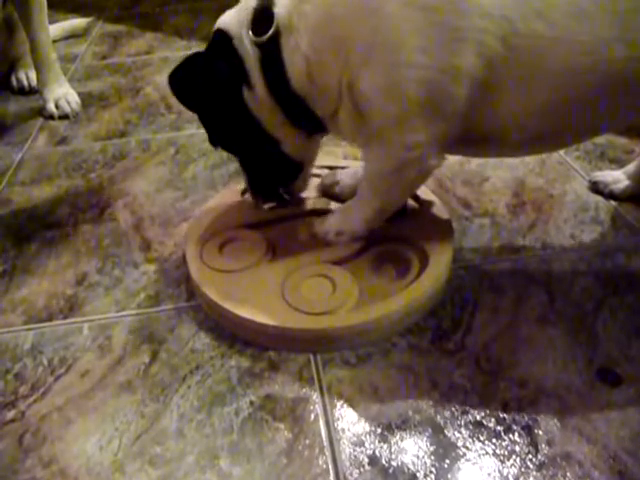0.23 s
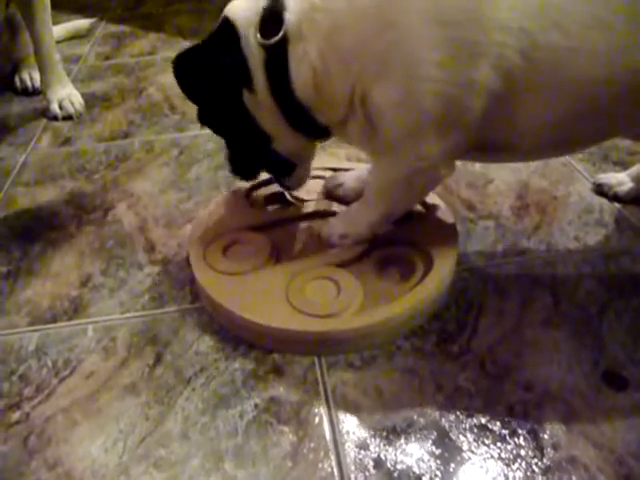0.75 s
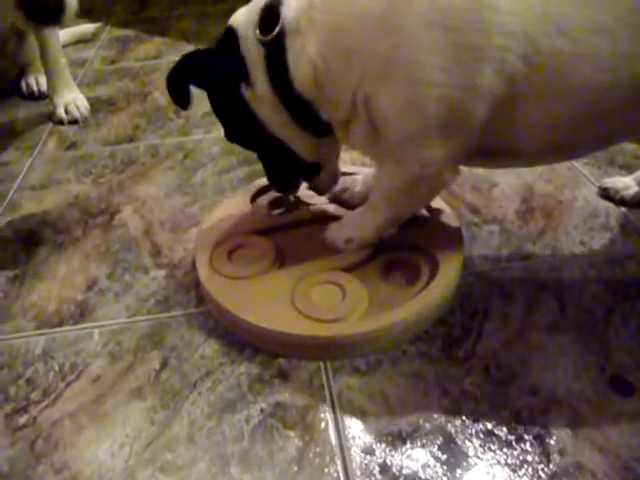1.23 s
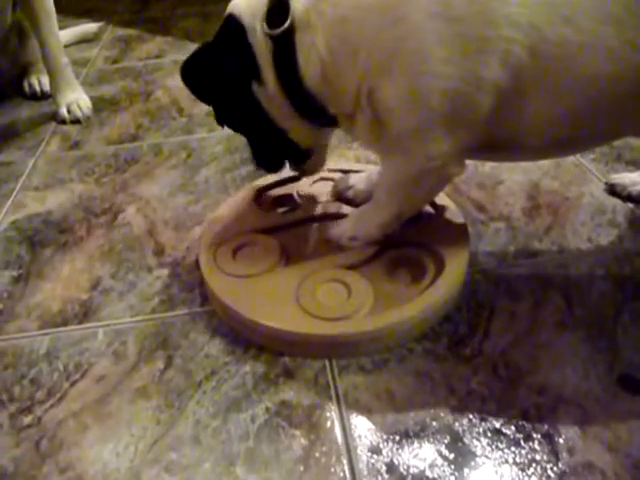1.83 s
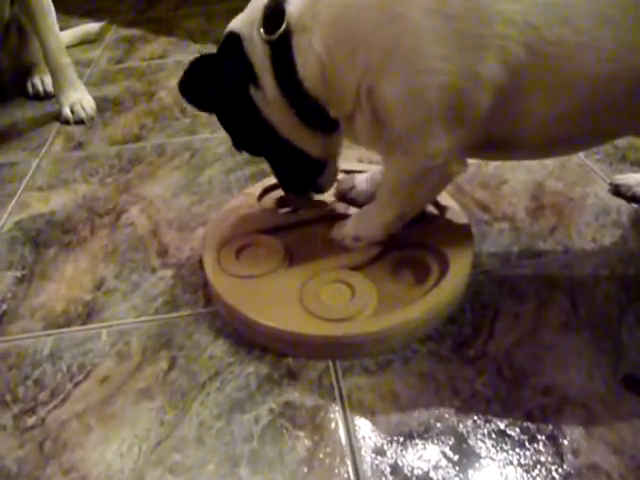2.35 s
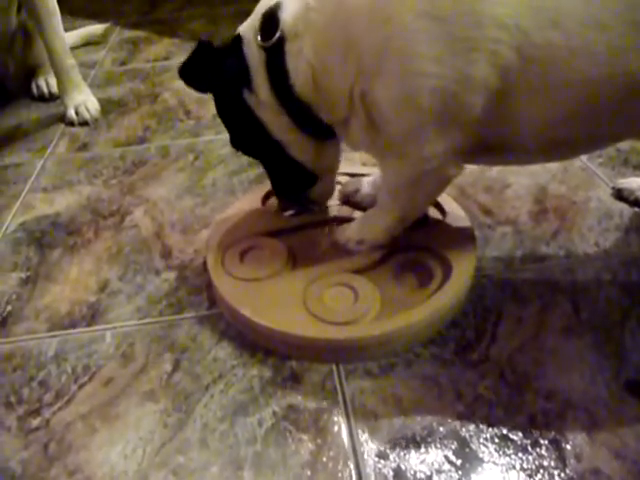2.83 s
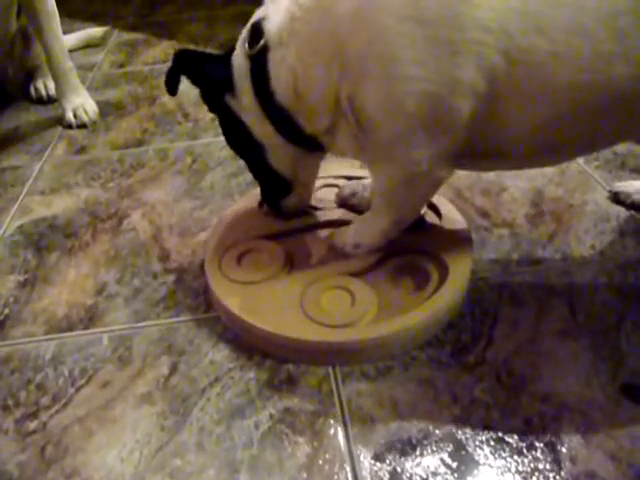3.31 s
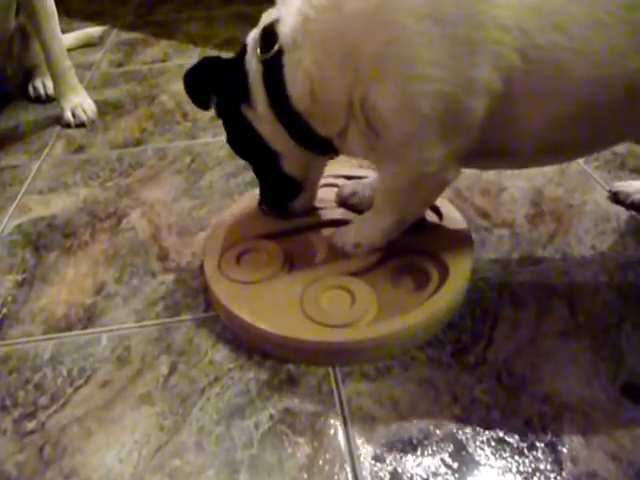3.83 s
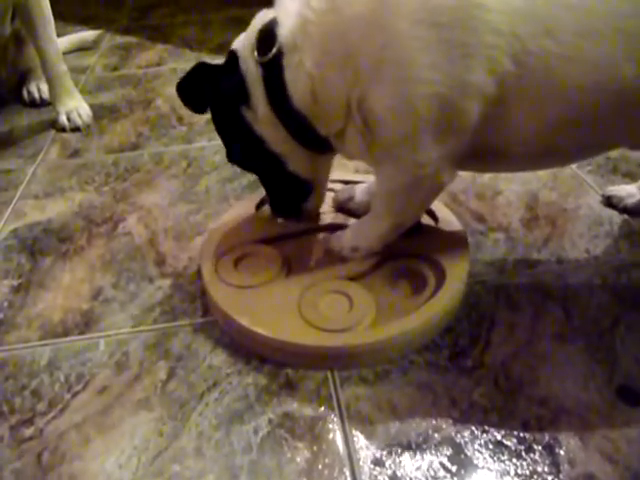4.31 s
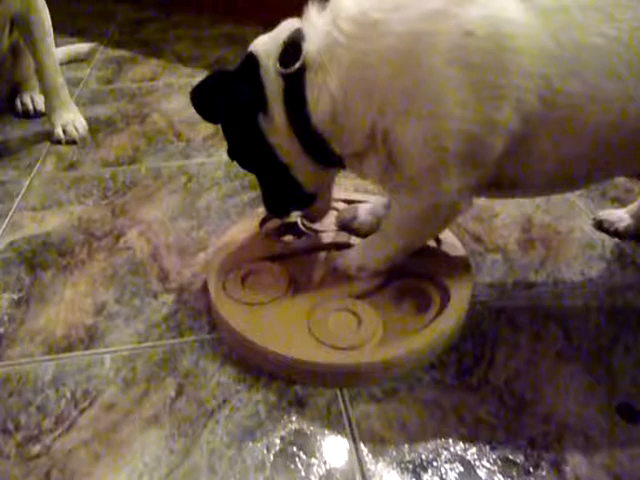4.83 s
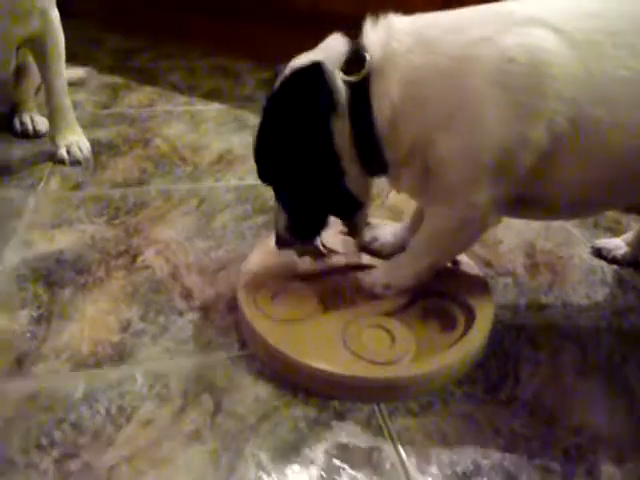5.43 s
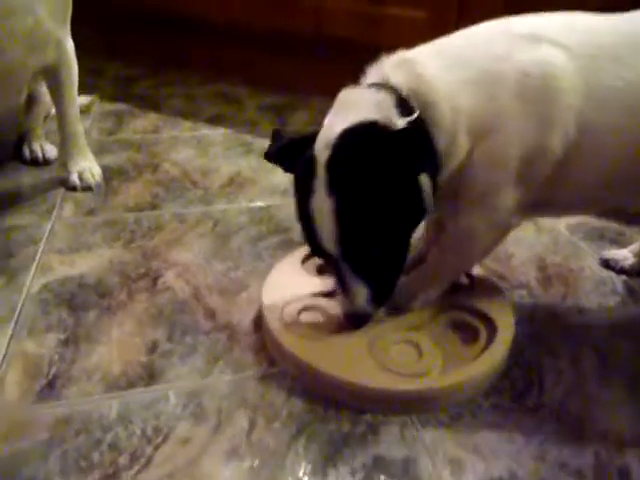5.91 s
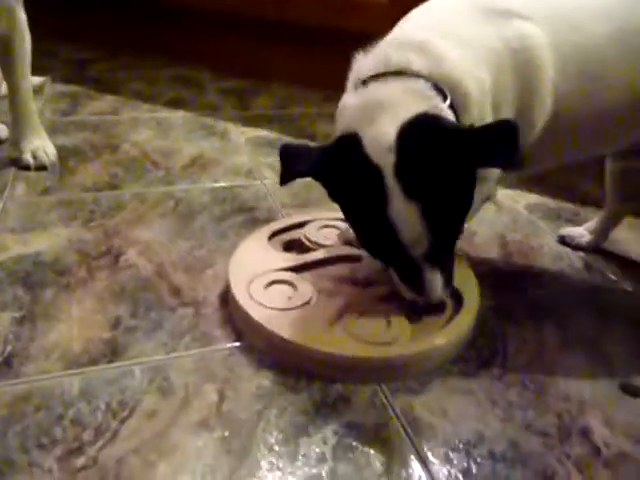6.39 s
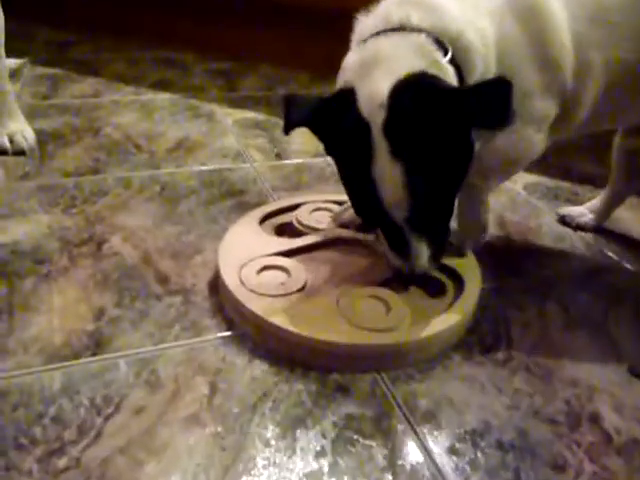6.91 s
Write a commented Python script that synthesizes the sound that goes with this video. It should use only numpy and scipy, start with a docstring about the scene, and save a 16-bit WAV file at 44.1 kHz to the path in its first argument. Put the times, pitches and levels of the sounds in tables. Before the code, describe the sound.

Dry knocks of loose discs on a hollow board, two very loud early on, then scraping, a sharp squeal and busy rattling indoors.

```python
"""A small dog noses and paws a wooden treat puzzle on the tiled floor of a live room.
From the start there is quiet room noise (shaped hiss) and a far motor (a sine) that slowly speeds up.
Discs knock on the board (fading sines), scrape in their grooves and snap on the rim (shaped noise).
From about 1.9 s one long push makes a disc groan, then squeal and creak (tones with uneven pitch).
From about 2.7 s soft bumps of the nose (short low sines) join the knocks and scrapes."""
import sys
import numpy as np
from scipy import signal
from scipy.fft import rfft, irfft
from scipy.io import wavfile

SR = 44100
rng = np.random.default_rng(int(sys.argv[2]) if len(sys.argv) > 2 else 0)


def digitize_waveform(pressure):
    """Quantize a signal to 16-bit integers and store it at the path in sys.argv[1].

    Rows of a 2-D input are taken as channels; values are limited to [-1, 1].
    """
    field = np.atleast_2d(pressure).T
    bounded = np.clip(field, -1, 1)
    quanta = np.round(bounded * 32767).astype(np.int16)
    wavfile.write(sys.argv[1], SR, quanta)


N = 315315
TIME = np.arange(N) / SR

# discs knock on the board:
# (time [s], level [dB], disc pitch [Hz], relative thud level [dB], time for the disc to fade by 60 dB [s])
KNOCK_EVENTS = [(0.031, -38, 1350, -6.5, 0.03), (0.056, -37.5, 1820, -4, 0.039),
                (.098, -28, 1580, -22, 0.0089), (0.09, -28, 1600, -28, 0.008),
                (0.139, -29, 1326, -10.5, 0.03), (0.166, -27.5, 1233, -16, 0.023),
                (0.195, -26.5, 1407, -16, 0.028), (.201, -27, 1300, -12.5, 0.014),
                (.451, -35, 1470, -12, 0.019), (0.366, -31.5, 1570, -33, 0.0073),
                (0.4646, -24.5, 1416, -11, 0.017), (.488, -23, 1365, -7, 0.026),
                (0.687, -37, 1480, -2.5, 0.0072), (0.935, -24, 900, -4.5, 0.009),
                (1.021, -1, 1577, -17, 0.011), (1.329, -7, 1520, -30, 0.026),
                (1.629, -27, 1543, -10.5, 0.019), (1.808, -43.5, 2010, -24, 0.02),
                (1.888, -30, 1560, -29, 0.006), (1.897, -33, 1500, -16, 0.0084),
                (1.925, -27.5, 1730, -11, 0.014), (1.936, -31, 1700, -12, 0.012),
                (1.984, -28.5, 1030, -3, 0.0048), (1.995, -25.5, 1373, -7, 0.021),
                (2.118, -33, 1780, -22, 0.011), (2.197, -27.5, 1840, -9, 0.017),
                (2.218, -29.5, 1410, -11, 0.0098), (2.45, -30.5, 1630, -3.5, 0.019),
                (2.532, -24.5, 1500, -16, 0.029), (2.847, -34, 1500, -13, 0.018),
                (2.869, -35, 1350, -26, 0.02), (2.883, -31.5, 1448, -10, 0.04),
                (2.946, -20, 1180, -13.5, 0.0051), (2.99, -29, 856, -23, 0.047),
                (3.233, -30, 1890, -22, 0.012), (3.278, -33.5, 1660, -25, 0.026),
                (3.414, -40.5, 1650, -8, 0.018), (3.451, -50, 1880, -14, 0.015),
                (3.649, -26, 1560, -13.5, 0.0048), (3.663, -35.5, 1500, -16, 0.0088),
                (3.85, -33.5, 970, -8, 0.024), (3.947, -36.5, 1010, -14, 0.02),
                (4.134, -29, 1432, -1.5, 0.026), (4.138, -32, 1047, -6, 0.014),
                (4.422, -43.5, 854, -19, 0.067), (4.17, -35.5, 920, -20, 0.015),
                (4.229, -30.5, 1300, -10.5, 0.019), (4.461, -39.5, 1436, -25, 0.032),
                (4.492, -26.5, 1560, -15, 0.022), (4.582, -29, 1476, -14.5, 0.02),
                (4.658, -17.5, 1200, -8, 0.02), (4.7176, -16.5, 1490, -10, 0.029),
                (4.816, -37, 1510, -24.5, 0.018), (4.825, -30, 1570, -15, 0.016),
                (4.836, -27.5, 960, 0, 0.012), (4.86, -30, 1386, -3, 0.031),
                (4.975, -33, 1400, -3.5, 0.027), (4.992, -42, 1440, -16, 0.021),
                (5.019, -32.5, 1410, -13, 0.028), (5.039, -28, 1640, -3, 0.01),
                (5.074, -33.5, 1450, -1, 0.027), (5.133, -27.5, 1230, -10, 0.015),
                (5.146, -35, 1190, 0, .018), (5.235, -24, 1400, -7.5, 0.015),
                (5.303, -26.5, 980, -9, 0.0083), (5.367, -32.5, 1240, -16, 0.021),
                (5.406, -37.5, 1570, -7, .014), (5.435, -32, 1290, -6, 0.022),
                (5.513, -26, 1240, -6, 0.027), (5.673, -31.5, 980, -7, 0.0098),
                (5.734, -24, 1410, -16, 0.0027), (5.767, -30.5, 1240, -3.5, 0.019),
                (6.248, -40.5, 1800, -1, 0.012), (6.29, -37.5, 1060, -4, 0.0082),
                (6.891, -31, 1710, -39, 0.0035), (7.122, -34, 1800, -24, 0.0035)]
MIDDLING_THUD_DB = -14   # thud column of a middling knock
SHORTEST_RING_S = 0.004


def from_db(db):
    """Turn decibels into a gain."""
    return 10 ** (np.asarray(db) / 20)


def rms_one(x):
    """Scale a sound to an rms (average strength) of 1."""
    return x / np.sqrt(np.mean(x ** 2) + 1e-20)


def at_hz(points, hz):
    """Read a table between its points, along a logarithmic frequency axis."""
    f, value = np.transpose(points)
    return np.interp(np.log(hz + 1), np.log(f), value)


def in_time(rows):
    """Read every column of a time table at each sample."""
    s, *columns = np.transpose(rows)
    return [np.interp(TIME, s, column) for column in columns]


def add(track, s, sound):
    """Mix a sound into a track at time s."""
    start = max(int(s * SR), 0)
    track[start:start + len(sound)] += sound[:N - start]


def drift(rate):
    """Smooth random wandering with a spread of about 1 and `rate` new values per second."""
    knots = rng.standard_normal(N // 40)
    return 1.2 * np.interp(TIME * rate, np.arange(len(knots)), knots)


def colour(x, spectrum):
    """Shape how strong each frequency is, then scale to rms 1."""
    hz = np.fft.rfftfreq(x.shape[-1], 1 / SR)
    shaped = irfft(rfft(x) * from_db(at_hz(spectrum, hz)), x.shape[-1])
    return rms_one(shaped)


def resonate(x, hz, width_hz):
    """Let one frequency ring, with gain 1 at its centre."""
    r = np.exp(-np.pi * width_hz / SR)
    feed = np.array([1, 0, -1]) * (1 - r * r) / 2
    feedback = [1, -2 * r * np.cos(2 * np.pi * hz / SR), r * r]
    return signal.lfilter(feed, feedback, x + 1e-18)


def glide(x, start_hz, end_hz, width_hz, size=128):
    """A resonance whose centre moves through the sound in small, even steps."""
    r = np.exp(-np.pi * width_hz / SR)
    state, out = np.zeros(2), np.zeros(len(x))
    for i in range(0, len(x), size):
        w = 2 * np.pi * (start_hz + (end_hz - start_hz) * i / len(x)) / SR
        feedback = [1, -2 * r * np.cos(w), r * r]
        out[i:i + size], state = signal.lfilter([1, 0, -1], feedback, x[i:i + size], zi=state)
    return out


def diffuse(size):
    """Stereo noise with all pitches equally strong, alike in the bass and mostly unrelated in the treble."""
    # likeness of left and right: (frequency [Hz], correlation [0 to 1])
    likeness = [(60, 0.92), (600, 0.92), (1300, 0.78), (2000, 0.29), (4000, 0.2), (8000, 0.071)]
    mid, side = rfft(rng.standard_normal((2, size)))
    alike = np.clip(at_hz(likeness, np.fft.rfftfreq(size, 1 / SR)), 0, .995)
    return irfft(np.sqrt(1 + alike) * mid + np.sqrt(1 - alike) * side * [[1], [-1]], size)


def grains(per_s, spread_db):
    """Tiny impacts at random times; a larger spread makes their sizes more uneven."""
    sizes = from_db(spread_db * np.minimum(rng.exponential(1, N), 4)) * rng.choice([-1, 1], N)
    return rms_one(sizes * (rng.random(N) < per_s / SR))


def stick_slip(hz, gains, jitter, flutter_db, jitter_rate):
    """A friction tone: surfaces stick and slip unevenly; each harmonic has its own gain."""
    phase = 2 * np.pi * np.cumsum(hz * (1 + jitter * drift(jitter_rate))) / SR
    tone = sum(gain * np.sin((k + 1) * phase) for k, gain in enumerate(gains))
    return tone * from_db(flutter_db * drift(jitter_rate))


def swell(peak_s, peak_db, rise_db_per_s, fall_db_per_s):
    """A gain that grows to its peak and dies away again."""
    rise = (peak_s - TIME) * abs(rise_db_per_s)
    fall = (TIME - peak_s) * abs(fall_db_per_s)
    return from_db(peak_db - np.maximum(rise, fall))


def background(air_db=-60.5, start_hz=44.3, top_hz=172, spin_up_s=15):
    """Room noise, and a far motor whose pitch climbs towards a top speed as its hum swells and fades."""
    # shape of the room noise: (frequency [Hz], relative level [dB per Hz])
    air = [(20, -7), (32, -3), (48, -8.5), (100, -1.5), (150, -2), (220, -4.5), (330, 0), (500, -6.5),
           (750, -3), (1700, -7.5), (2400, -7.5), (3500, -14), (6500, -14), (9500, -31.5)]
    # loudness of the motor hum: (time [s], level [dB])
    hum_level = [(0, -84), (1.1, -86), (1.6, -69.5), (2.2, -75), (2.65, -63.5), (3.15, -79.5), (3.75, -63),
                 (4.1, -67.5), (4.5, -85.5), (5.2, -69.5), (6.4, -74), (7.15, -80)]
    hz = top_hz - (top_hz - start_hz) * np.exp(-TIME / spin_up_s)
    level_db, = in_time(hum_level)
    hum = np.sqrt(2) * from_db(level_db) * np.sin(2 * np.pi * np.cumsum(hz) / SR)
    return hum + from_db(air_db) * colour(diffuse(N), air)


def nosing(bump_db=-2.5, swell_s=0.005, hollow_db=-68, hollow_hz=520, hollow_width_hz=70,
           patter_db=-68, patter_hz=1550, busy_s=0.028):
    """Soft nudges sound the board's hollow; tiny ticks of teeth and claws scatter after the blows."""
    # soft bumps of the nose on the hollow board: (time [s], level before bump_db [dB], pitch [Hz])
    bumps = [(2.678, -41, 469), (3.353, -47, 601), (4.06, -46.5, 550), (5.515, -37, 526), (5.86, -40, 525),
             (6.144, -48.5, 549), (6.174, -46.5, 495), (6.657, -44.5, 504), (6.803, -41.5, 510),
             (6.605, -44.5, 525), (7.052, -46.5, 497)]
    t, out = TIME[:SR // 8], np.zeros(N)
    for s, level_db, hz in bumps:
        envelope = t / swell_s * np.exp(1 - t / swell_s)
        add(out, s, from_db(level_db + bump_db) * envelope * np.sin(2 * np.pi * hz * t))
    nudges = resonate(grains(per_s=83, spread_db=0.0), hollow_hz, hollow_width_hz)
    hollow = rms_one(resonate(nudges, hollow_hz, 3 * hollow_width_hz))
    # the ticks are strongest just after a knock and then fade
    coarse = TIME[::SR // 100]
    since = coarse[:, None] - np.array(KNOCK_EVENTS)[:, 0]
    busy = ((since > coarse[1]) * np.exp(-np.abs(since) / busy_s)).sum(1)
    touches = grains(per_s=200, spread_db=10.0) * np.interp(TIME, coarse, np.minimum(busy, 1))
    patter = rms_one(resonate(resonate(touches, patter_hz, width_hz=1100), patter_hz, width_hz=720))
    return out + from_db(hollow_db) * hollow + from_db(patter_db) * patter


def rattle(level_db, chatter_db=-12.0, firm_db=-18, chatter_s=.013, count=3):
    """A blow is one contact and a few rebounds; the firmest blows rebound less."""
    contacts = np.zeros(SR // 20)
    contacts[0] = 1
    at = np.minimum(rng.uniform(0.2004, 1, count) * chatter_s * SR, len(contacts) - 1).astype(int)
    contacts[at] += from_db(chatter_db - max(level_db - firm_db, 0)) * rng.choice([-1, 1], count)
    return contacts


def crack_level(disc_t60, reference_db=-24, reference_t60_s=0.017, fall_db=3):
    """A firmly pinned disc cracks dryly, a loose one rings: the crack drops as the ring time doubles."""
    return reference_db - fall_db * np.log2(max(disc_t60, SHORTEST_RING_S) / reference_t60_s)


def knocks(disc_db=14.5, ring_db=-2.5, thud_db=-16.0, crack_s=0.0028, crack_rise_s=0.0003,
           vary_db=2.0, detune=0.031, coupling=.3, thud_top_hz=900):
    """Each blow rings the disc and the board at their own pitches (modes), with a crack of contact."""
    # modes of a disc: (ratio to its pitch, relative level [dB])
    disc_modes = [(0.875, -11), (1.002, 4.5), (1.085, -6), (1.21, -11.5)]
    # modes of the board: (frequency [Hz], relative level [dB], time to fade by 60 dB [s])
    board_modes = [(156, -14, 0.091), (203, -6.5, 0.082), (281, -9, 0.095), (439, 5.5, 0.04),
                   (509, -5, 0.066), (587, -3, 0.1), (862, -5, 0.074), (1040, 1.5, 0.03),
                   (1166, 4.5, 0.031), (1502, 8.5, 0.017), (1720, -11.5, 0.021), (1755, 8, 0.016),
                   (2030, 3.5, 0.0089)]
    # the crack of a hard contact: (frequency [Hz], relative level [dB per Hz])
    crack_spectrum = [(1700, -1), (2400, 3.5), (3300, -0.5), (4000, 0.5), (5100, -3.5), (6400, -6),
                      (7200, -11.5), (8000, -23), (9500, -28)]
    t, out = TIME[:SR // 8], np.zeros(N)
    attack = slice(0, SR // 180)
    hz, mode_db, t60 = np.transpose(board_modes)[:, :, None]
    low = hz[:, 0] < thud_top_hz
    for s, level_db, disc_hz, low_db, disc_t60 in KNOCK_EVENTS:
        strength, load, spot = rng.standard_normal((3, len(board_modes), 1))
        # the paw's load shifts the modes, and the signs of the low ones depend on the spot that is hit
        loaded_hz = hz * (1 + detune * load)
        fading = from_db(mode_db + vary_db * strength - 60 * t / t60)
        struck = fading * np.sin(2 * np.pi * loaded_hz * t)
        partials = sum(from_db(db + vary_db * rng.standard_normal()) * np.sin(2 * np.pi * ratio * disc_hz * t)
                       for ratio, db in disc_modes)
        disc = from_db(disc_db - 60 * t / max(disc_t60, SHORTEST_RING_S)) * partials
        # the board's upper modes ring louder when the knock's thud is heavier
        board = from_db(coupling * (low_db - MIDDLING_THUD_DB)) * struck[~low].sum(0)
        ring = (disc + board) * (1 - np.exp(-t / 0.00093))
        thud = (struck * np.sign(spot))[low].sum(0) * (1 - np.exp(-t / 0.0015))
        crack = colour(rng.standard_normal(len(t)), crack_spectrum)
        crack = crack * np.exp(-t / crack_s) * (1 - np.exp(-t / crack_rise_s))
        blow = (from_db(ring_db) * ring / np.abs(ring).max()
                + from_db(thud_db + low_db) * thud / thud[attack].std()
                + from_db(crack_level(disc_t60)) * crack / crack[attack].std())
        add(out, s, from_db(level_db) * signal.fftconvolve(blow, rattle(level_db)))
    return out


def weight(s):
    """The weight on the board at time s, read from the thud column of the knocks around it."""
    times, _, _, thud_db, _ = np.transpose(KNOCK_EVENTS)
    return np.interp(s, times, thud_db)


def scrapes(rasp_width_hz=650, rough_db=3.5, rough_share=0.13, hiss_rough_db=2.5, edge_s=0.015,
            swell_share=0.12, middling_rasp_db=-50.5, middling_rumble_db=-59, force_share=0.44,
            weight_share=0.36):
    """Sliding is a dense run of slips that sounds the disc, the board below it and a hiss above."""
    # discs sliding, muzzle rubbing: (time [s], length [s], rasp level [dB], rasp pitch at start [Hz],
    # rasp pitch at end [Hz], hiss level [dB], hiss tilt [dB per octave])
    strokes = [(0.091, .14, -52, 1580, 890, -70.5, 1), (0.364, 0.039, -44, 1730, 1170, -47, -17),
               (0.397, 0.1, -53, 1580, 560, -68, 10), (0.652, 0.034, -54, 1400, 1400, -59.5, -6),
               (1.577, 0.078, -51, 1680, 1230, -59, 0), (1.866, 0.18, -56, 1650, 750, -61.5, 4),
               (2.159, 0.095, -50, 1970, 1400, -56.5, 3), (2.229, 0.085, -53, 1150, 760, -58.5, 5),
               (2.312, 0.22, -59.5, 1800, 820, -57, 14), (2.505, 0.097, -47.5, 1450, 740, -49.5, -1),
               (2.84, 0.058, -48, 1500, 680, -64.5, -12), (2.945, 0.025, -34, 1190, 880, -54.5, 1),
               (2.97, 0.11, -50.5, 1000, 690, -68, 2.5), (3.605, 0.07, -55.5, 1490, 1540, -61.5, -1),
               (3.666, 0.16, -69, 1300, 910, -64, 2), (3.846, 0.045, -51.5, 1040, 1030, -70, -1),
               (4.152, .05, -64, 1350, 1100, -63.5, 4), (4.773, 0.11, -60, 1540, 1200, -65, -3),
               (5.017, 0.075, -46, 1690, 1130, -59, 6.5), (5.12, 0.089, -55, 1280, 930, -66.5, 4),
               (5.326, 0.22, -57.5, 1270, 1050, -60.5, -1.5), (5.564, 0.098, -57.5, 1400, 1100, -61.5, 8),
               (5.725, 0.081, -51, 1300, 1100, -50, 1.5), (5.795, 0.089, -58, 1190, 720, -58.5, 2),
               (6.014, 0.064, -54, 1390, 960, -65.5, -7), (6.288, 0.062, -60, 1100, 1800, -63.5, 4),
               (6.369, 0.12, -54.5, 1040, 1100, -62, -1.5), (6.517, 0.084, -51.5, 1200, 2560, -59, 6.5),
               (6.574, 0.051, -60.5, 1800, 1800, -52.5, 9)]
    # shapes of the hiss and the rumble of rubbing: (frequency [Hz], relative level [dB per Hz])
    hiss_spectrum = [(1800, -37.5), (3000, 9), (3700, 9), (5000, 6), (6500, 5), (7600, -2.5), (9500, -17.5)]
    rumble_spectrum = [(40, 2), (120, 6.5), (210, 2.5), (330, 8), (520, 13.5), (800, 1), (1300, -33)]
    catching = drift(110)   # the surfaces grip and let go unevenly
    slips = grains(per_s=3200, spread_db=1.0)
    rumble = colour(slips * from_db(rough_db * catching), rumble_spectrum)
    grit = grains(per_s=4900, spread_db=3.5) * from_db(hiss_rough_db * catching)
    out = np.zeros(N)
    for s, length, rasp_db, start_hz, end_hz, hiss_db, tilt_db in strokes:
        extra_force_db = rasp_db - middling_rasp_db
        extra_weight_db = weight(s + length / 2) - MIDDLING_THUD_DB
        rumble_db = middling_rumble_db + force_share * extra_force_db + weight_share * extra_weight_db
        span = (TIME >= s) & (TIME < s + max(length, .01))
        t = TIME[span] - s
        fade = np.minimum(t / (edge_s + swell_share * length), (t[-1] - t) / edge_s)
        press = np.sin(np.pi / 2 * np.clip(fade, 0, 1))
        grip_db = max(rough_db + rough_share * extra_force_db, 0)   # light strokes glide, hard ones catch
        rasp = glide(slips[span] * from_db(grip_db * catching[span]), start_hz, end_hz, rasp_width_hz)
        rasp = glide(rasp, start_hz, end_hz, 2 * rasp_width_hz)
        hiss = colour(grit[span], [(hz, db + tilt_db * np.log2(hz)) for hz, db in hiss_spectrum])
        stroke = (from_db(rasp_db) * rms_one(rasp)
                  + from_db(rumble_db) * rms_one(rumble[span])
                  + from_db(hiss_db) * hiss)
        add(out, s, press * stroke)
    return out


def ticks(gain_db=-0.5, width_hz=3200, decay_s=0.0026, rise_s=0.00014, top_hz=7000):
    """A hard point meets the rim: a short burst of noise makes a bright snap without a long ring."""
    # claws, teeth and disc edges snap on the rim:
    # (time [s], level before gain_db [dB], brightness [Hz])
    snaps = [(.097, -45, 4500), (0.368, -45.5, 3500), (.932, -30.5, 5700), (1.0207, -13, 5200),
             (1.202, -44.5, 4350), (1.499, -39, 7300), (1.627, -43, 6750), (1.897, -35.5, 5500),
             (1.971, -44, 5000), (1.986, -42, 5050), (2.172, -45, 3770), (2.241, -35.5, 5100),
             (3.413, -47.5, 5900), (3.665, -40.5, 3370), (4.177, -47.5, 4900), (4.79, -37, 3200),
             (5.407, -42.5, 3400), (5.479, -51, 5900), (5.611, -36.5, 6260), (5.698, -38, 4460),
             (5.712, -39, 5000), (5.734, -30.5, 5300), (5.749, -33, 6200), (6.308, -47, 6400),
             (6.831, -43.5, 5540), (6.97, -46, 6100)]
    t, out = TIME[:SR // 30], np.zeros(N)
    for s, level_db, hz in snaps:
        snap = rng.standard_normal(len(t)) * np.exp(-t / decay_s) * (1 - np.exp(-t / rise_s))
        snap = resonate(resonate(snap, hz, width_hz), hz, 2 * width_hz)
        add(out, s, from_db(level_db + gain_db) * snap / np.abs(snap).max())
    return signal.sosfilt(signal.butter(6, top_hz, fs=SR, output="sos"), out)


def groans():
    """The board groans: a low friction tone that bends with the pressure of the push."""
    # the course of the groan: (time [s], pitch [Hz], level [dB])
    groan_course = [(1.92, 258, -77), (1.95, 265.7, -53), (2.21, 266.7, -61), (2.28, 208, -60),
                    (2.4, 292.2, -67), (2.455, 210, -53), (2.51, 200, -59), (2.57, 295, -62.5),
                    (2.62, 300, -83)]
    hz, level_db = in_time(groan_course)
    tone = stick_slip(hz, [from_db(level_db)], jitter=.035, flutter_db=4, jitter_rate=90)
    return tone * (TIME > groan_course[0][0]) * (TIME < groan_course[-1][0])


def squeal(shrill_hz=6680, shrill_db=-12.0):
    """The pushed disc squeals; at the height of the push a rough second tone joins its octave."""
    # pitch wavers, and the octave breaks out where the pressure peaks:
    # (time [s], pitch [Hz], level [dB], octave level [dB])
    squeal_course = [(2.14, 3216, -63.5, -64), (2.33, 3200, -56, -63), (2.37, 3200, -54.5, -61),
                     (2.402, 3200, -44.5, -47.5), (2.436, 3150, -52, -36.5), (2.482, 3172, -37.5, -43),
                     (2.522, 3190, -41, -69), (2.572, 3210, -60, -59), (2.6, 3270, -75, -85)]
    hz, level_db, octave_db = in_time(squeal_course)
    tone = stick_slip(hz, [from_db(level_db), from_db(octave_db)], jitter=.006, flutter_db=3, jitter_rate=420)
    shrill_gain = from_db(octave_db + shrill_db)
    shrill = stick_slip(shrill_hz, [shrill_gain], jitter=0.013, flutter_db=5.5, jitter_rate=600)
    return (tone + shrill) * (TIME > squeal_course[0][0]) * (TIME < squeal_course[-1][0])


def creak(peak_s=2.308, peak_hz=1333, sag_hz_per_s=1200):
    """A short, rough friction tone that slides down in pitch as the disc starts to give."""
    hz = peak_hz - sag_hz_per_s * (TIME - peak_s)
    gain = swell(peak_s, peak_db=-44.5, rise_db_per_s=326, fall_db_per_s=110)
    return stick_slip(hz, [gain], jitter=0.0214, flutter_db=3.5, jitter_rate=860)


def room(x, t60=0.47, wet_db=-4.0, build_s=0.00074, pan_db=-0.5, spread_db=-5.5, spread_hz=2400,
         spread_s=0.00064):
    """Direct sound, a few near reflections and the spread-out, fading echo of a tiled room."""
    # near surfaces: (delay [s], level [dB])
    echoes = [(.0032, -17.5), (0.023, -20)]
    t = TIME[:SR]
    tail = diffuse(SR) * from_db(-60 * t / t60) * (1 - np.exp(-t / build_s))
    near = np.zeros(SR)
    near[0] = 1
    for delay, level_db in echoes:
        near[int(delay * SR)] += from_db(level_db)
    # short waves scatter and reach the left and right microphones differently
    treble = signal.butter(2, spread_hz, "high", fs=SR, output="sos")
    scattered = signal.sosfilt(treble, np.roll(near, int(spread_s * SR)))
    direct = near * from_db([[pan_db], [-pan_db]]) + from_db(spread_db) * scattered * [[1], [-1]]
    response = direct + from_db(wet_db) * rms_one(tail) / np.sqrt(SR)
    return signal.fftconvolve(x[None], response, axes=1)[:, :N]


def scene(bass_hz=130):
    """The puzzle in its room; so small a board gives out little bass."""
    puzzle = nosing() + knocks() + scrapes() + ticks() + groans() + squeal() + creak()
    less_bass = signal.butter(2, bass_hz, "high", fs=SR, output="sos")
    return room(signal.sosfilt(less_bass, puzzle)) + background()


def record(dry, cutoff_hz=9800):
    """The small microphone weakens some narrow bands, lifts one a little, and the top is cut."""
    # bands of the microphone: (centre [Hz], width [Hz], change [dB], negative for a dip)
    mic_bands = [(2516, 960, -15.5), (2654, 160, -9), (3254, 410, 3.5), (4590, 710, -20.5),
                 (5416, 265, -19.5)]
    for hz, width_hz, change_db in mic_bands:
        dry = dry - (1 - from_db(change_db)) * resonate(dry, hz, width_hz)
    return signal.sosfilt(signal.ellip(10, .2, 70, cutoff_hz, fs=SR, output="sos"), dry)


dry = scene()
out = record(dry)
digitize_waveform(out)
```